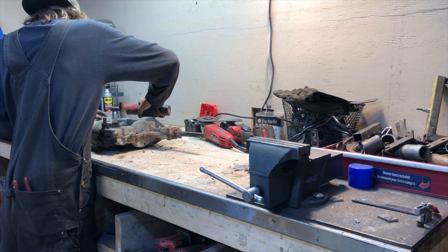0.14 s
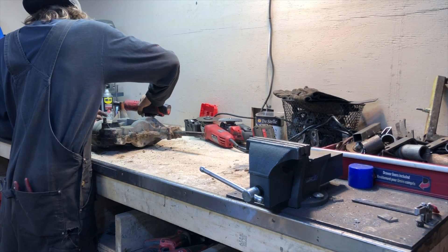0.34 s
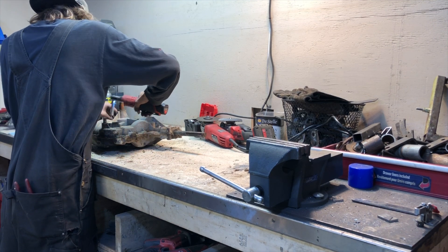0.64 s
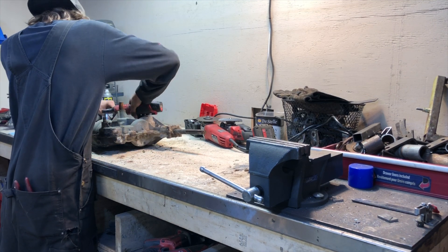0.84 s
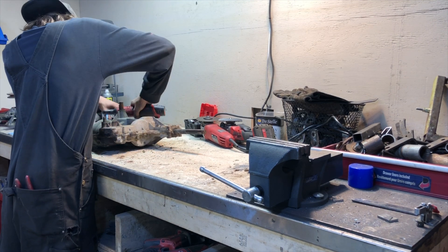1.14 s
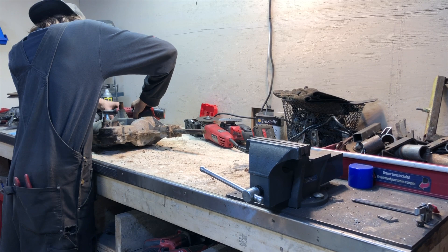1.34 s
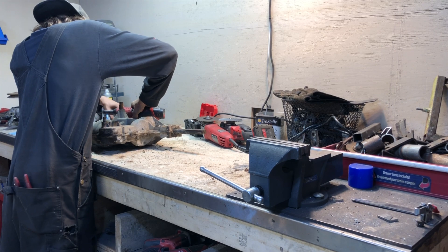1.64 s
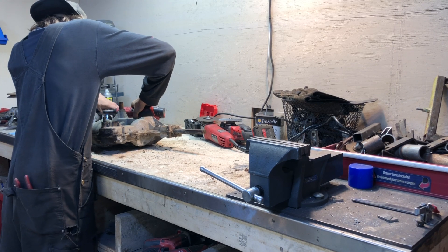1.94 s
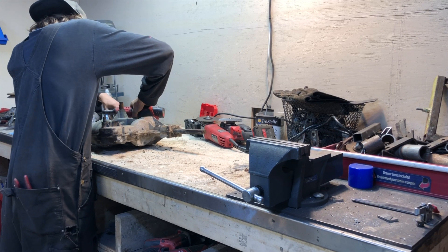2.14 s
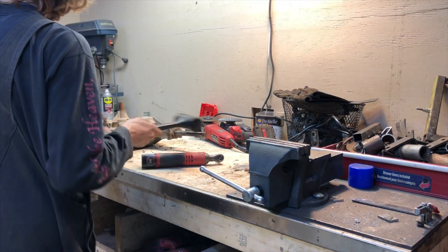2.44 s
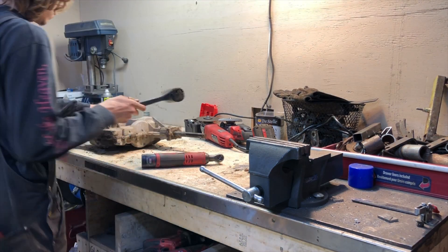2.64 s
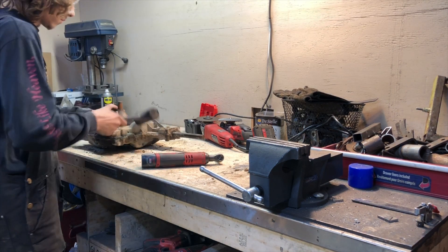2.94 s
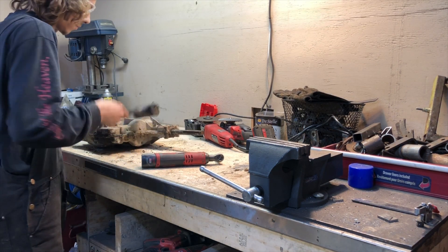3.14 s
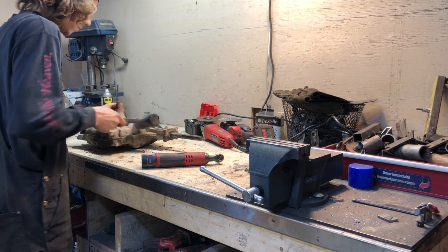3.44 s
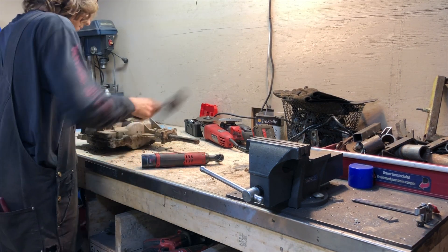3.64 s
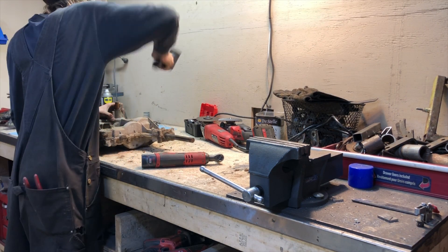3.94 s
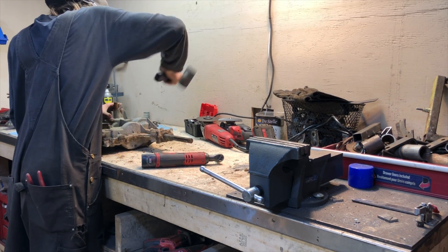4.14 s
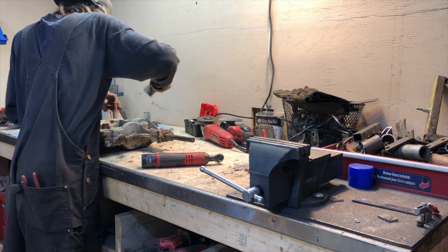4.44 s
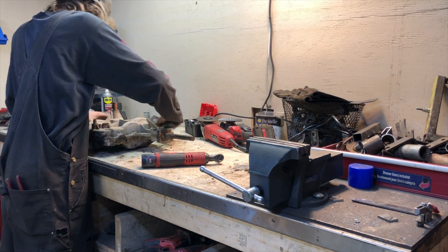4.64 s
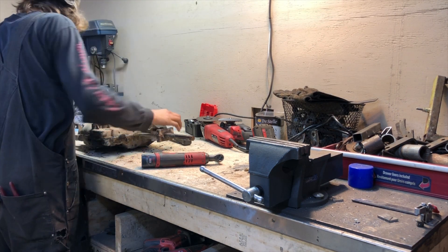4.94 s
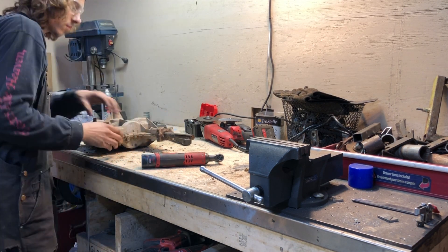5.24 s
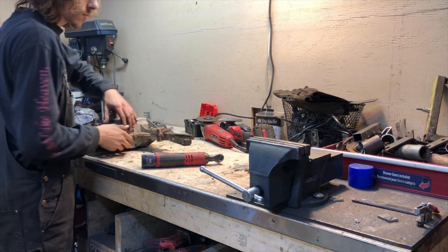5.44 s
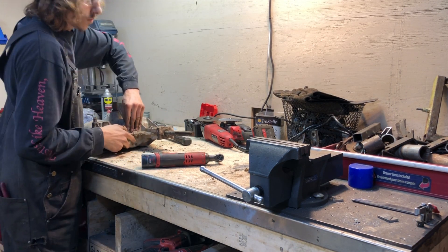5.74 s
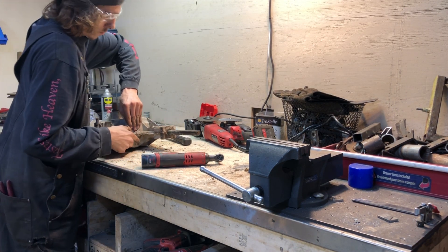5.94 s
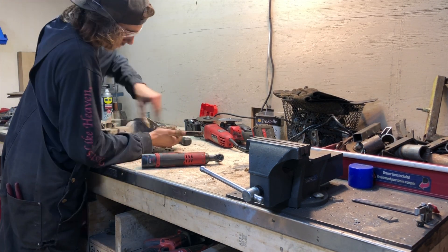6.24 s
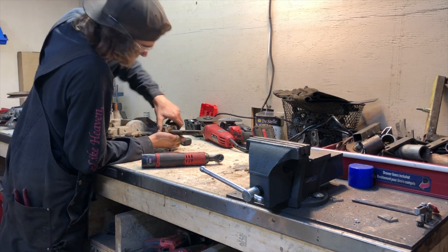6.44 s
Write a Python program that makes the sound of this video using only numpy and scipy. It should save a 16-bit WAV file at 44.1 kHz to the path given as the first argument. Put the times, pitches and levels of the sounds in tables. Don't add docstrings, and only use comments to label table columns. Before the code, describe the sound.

Close over a wooden bench in a low garage, a small electric ratchet whirs with gritty hiss and coasts to a stop. It clacks and knocks onto a bolt, then drives hard with the bench droning beneath. An abrupt cut leads to ten quick mallet blows on a ringing metal case, growing woodier; the case is laid down with a clunk, and hands rustle and scrape loose parts.

```python
import sys
import numpy as np
from scipy import signal
from scipy.fft import rfft, irfft, next_fast_len
from scipy.io import wavfile
from scipy.ndimage import uniform_filter1d, map_coordinates

SR = 44100
rng = np.random.default_rng(int(sys.argv[2]) if len(sys.argv) > 2 else 0)


def magnitude_from_level(level_db):
    exponent = np.asarray(level_db, float) / 20
    return 10 ** exponent


def inscribe(sig):
    pcm = np.round(np.clip(np.atleast_2d(sig).T, -1, 1) * 32767)
    wavfile.write(sys.argv[1], SR, pcm.astype(np.int16))


N = 291060
SCENE_CHANGE_S = 2.388

# frequency [Hz], level [dB per Hz].
AIR_COLOUR = [(24, -30), (40, -16), (140, 10), (410, -2), (935, -4), (1090, -2.5), (2140, -13), (4090, -14),
              (5390, -22), (8450, -18), (15800, -36)]
# frequency [Hz], time to fall 60 dB [s].
ROOM_DECAY = [(100, 0.39), (300, 0.32), (1000, .26), (4000, 0.27), (13000, 0.22)]

# start [s], length [s], rustle [dB], scrape [dB].
HAND_STROKES = [(2.39, 0.15, -49.5, -61), (4.53, 0.049, -97, -72.5), (5.11, 0.034, -66, -67),
                (5.2, 0.046, -50, -54.5), (5.3, 0.24, -65, -70), (5.555, 0.039, -59, -70),
                (5.62, 0.049, -67, -61.5), (5.73, 0.031, -55, -69.5), (5.8, 0.033, -58, -66),
                (5.905, .05, -58.5, -53.5), (5.96, 0.065, -59.5, -55), (6.022, .035, -53.5, -54),
                (6.085, .005, -57.5, -66), (6.15, 0.028, -63, -73), (6.243, .008, -59.5, -60),
                (6.275, .02, -63, -65), (6.45, .15, -63, -58.5)]
# frequency [Hz], level [dB per Hz].
CLOTH_COLOUR = [(710, -4), (1200, -0.5), (1730, -5), (1860, -2), (2520, -4.5), (4600, -7.5), (15600, -18)]
# frequency [Hz], level [dB per Hz].
DRAG_COLOUR = [(180, -40.5), (300, 1.5), (755, 5), (968, -7), (1110, -1), (2500, -15.5), (3250, -44.5),
               (5500, -120)]

# time [s], frequency [Hz], level [dB].
SOCKET_SONG = [
    [(0, 8240, -55), (.4, 8360, -46), (.5, 8200, -70)],
    [(1.2, 8150, -65), (1.35, 8240, -47), (1.7, 8260, -49), (1.85, 8140, -30.5), (1.9, 8200, -65)],
]
# time [s], frequency [Hz], level [dB].
SOCKET_PING = [
    [(2.573, 8280, -52), (2.7, 8280, -75)],
    [(2.764, 8285, -45), (2.94, 8285, -72)],
]
# frequency [Hz], level [dB].
CONTROL_WHINE = [(3763, -59), (7407, -68), (11073, -71)]
# time [s], whine level [dB].
TRIGGER = [
    (.962, -20),
    (.978, -8),
    (1.0, 12),
    (1.012, -15),
]

# time [s], shaft speed [turns per s], load pressed into the bench [dB].
COASTING = [
    (0.0, 140, -6),
    (0.35, 156.4, -12.5),
    (0.426, 152.9, -19.5),
    (0.48, 131.4, -20),
    (0.594, 106.7, -25),
    (0.682, 98.5, -49),
    (0.775, 77, -70),
]
# time [s], shaft speed [turns per s], load pressed into the bench [dB].
DRIVING = [
    (0.986, 120.6, -28),
    (1.014, 130.9, 4),
    (1.046, 128.6, 7.5),
    (1.141, 153.5, -2),
    (1.184, 152.1, 1.5),
    (1.3, 154.2, -2),
    (2.1, 156.2, -1.5),
    (2.355, 156.4, 1.5),
    (2.383, 159.4, -13),
]
# multiple of shaft speed, level [dB].
SHAFT_ORDERS = [(1, -10.5), (2, 1.5), (3, -4.5), (4, -0.5), (4.41, 4), (5, 0), (6, -2.5), (8, -4.5),
                (10, -6), (11, -6), (16, 0), (17, -3.5), (18, -1), (19, -4.5)]
# frequency [Hz], level [dB per Hz].
HISS_COLOUR = [(530, -61), (900, -7.5), (967, -19.5), (1000, -10), (1230, -8), (1700, -4.5), (2080, -5),
               (2580, -5), (3870, -4.5), (4970, -0.5), (8210, 1), (9140, 0.5), (15600, 2)]
# frequency [Hz], width [Hz], level over the hiss [dB].
HOUSING_MODES = [(1480, 50, 4), (1530, 47, -12.5), (1719, 31, -1.5), (2330, 29, -4), (2320, 50, -20),
                 (2576, 22, 4), (3000, 110, -3), (3360, 320, -3), (3530, 60, 2.5), (3805, 160, -0.5),
                 (4350, 48, 1.5), (6180, 69, -2), (7150, 220, -5.5), (8200, 210, -2.5), (11300, 150, -3.5),
                 (12600, 110, -8.5), (14330, 20, -10), (14750, 370, -3)]
# frequency [Hz], width [Hz], level [dB].
DRONE_MODES = [(110, 10, -17), (164, 23, -13.5), (210, 14, -18), (330, 13, -3.5), (398, 16, -4.5),
               (522.6, 17, 1), (614, 22, -3), (693.5, 8.5, 3), (774, 9.5, 0), (877, 24, -12.5)]

# frequency [Hz], level [dB], time to fall 60 dB [s].
BENCH_AND_CASE_MODES = [(114, 5, 0.26), (169.8, 4, 0.079), (199, -0.5, 0.12), (229, -6, 0.081), (284.2, 4.5, 0.12),
                        (310.4, -2.5, 0.19), (381, 1.5, 0.19), (407.3, -1.5, 0.17), (462.4, -9, 0.39),
                        (522, 2.5, .2), (606, 0.5, 0.2), (682, -1.5, 0.24), (772, -4, 0.18), (897, -11.5, 0.099),
                        (1176, -10.5, .22), (1234, -12, 0.067), (1338, -11, 0.12), (1386, -8, .2), (1572, -1, 0.043),
              (1806, -14, 0.34), (1870, -6.5, 0.1), (2080, -25.5, .2), (2220, -12, 0.1), (2540, -11, 0.055),
              (2630, -13, 0.05), (2930, -11, 0.31), (3430, -6, .12), (3820, -10.5, .1)]
# time [s], strength [dB], wood over case [dB], sharpness [dB].
CLACKS = [
    (0.77, -44, 7.2, 8),
    (0.7948, -45, 6.6, 15),
    (0.955, -63.5, 3.7, 4),
]
# time [s], strength [dB], wood over case [dB], sharpness [dB].
KICKS = [
    (1.011, -42.5, 7, -21),
    (1.033, -23.5, 6, -40.5),
    (1.069, -39, -2.1, -19.5),
]
# time [s], strength [dB], wood over case [dB], sharpness [dB].
KNOCKS = [
    (0.8345, -34.5, -10.5, -8),
    (0.8594, -41, 3, -6),
    (4.5363, -54.5, 0.4, -17),
    (5.3382, -59, 13, 1),
    (5.7109, -32.5, -7.5, -19.5),
    (5.7743, -42.5, 1, -5.5),
    (6.2794, -57.5, -9, 2.5),
    (6.4344, -38, -11, -26),
    (6.4986, -41.5, -6.5, -19),
    (6.5455, -45.5, -10, -15),
]
# time [s], strength [dB], wood over case [dB], sharpness [dB].
TAPS = [
    (2.4044, -36, 15, -12.5),
    (4.7496, -25.5, -18.5, -12),
    (4.7866, -13.5, -2, -20.5),
    (6.1177, -49.5, -18, -26),
]
# time [s], strength [dB], wood over case [dB], sharpness [dB].
REBOUNDS = [
    (2.8194, -23, 2.5, -5),
    (2.8436, -26, 3, -3),
    (3.7509, -35.5, 3, 5),
    (3.8102, -49.5, -3, 14),
    (4.0634, -30, 3, 1),
    (4.37, -45.5, -2, 6),
    (4.6214, -34, 12.5, -14.5),
    (4.6646, -44.5, 23, -14),
]
# time [s], strength [dB], wood over case [dB], sharpness [dB].
BLOWS = [
    (2.5714, -15.5, -7, -5),
    (2.7624, -15.5, -7, -3),
    (2.9552, -12.5, -7, -3.5),
    (3.1322, -12, 2.5, -3.5),
    (3.3044, -13.5, -5.5, 1.5),
    (3.4664, -12, -11.5, 0),
    (3.6752, -13, 14, -8.5),
    (3.8581, -7.5, 6, -13.5),
    (4.0386, -18.5, 11.5, -5.5),
    (4.2111, -10, 14, -11),
]
# edge, thud, wood, case, clank [Hz], for each kind of contact.
BLOW_HZ = [9000, 130, 290, 1300, 3000]
KNOCK_HZ = [9000, 140, 330, 850, 3400]
TAP_HZ = [8000, 140, 330, 760, 1900]
CLACK_HZ = [6000, 140, 600, 1150, 3400]
PART_SPREAD = [-8.5, 12, 7.5, 9.5, 3.5]


def unit(x):
    return x / np.sqrt(np.mean(x ** 2) + 1e-20)


def along(points, hz):
    f, v = np.transpose(points)
    return np.interp(np.log(hz + 1), np.log(f + 1), v)


def curves(*tables, rest=-120):
    t = np.arange(N) / SR
    out = np.full((len(tables[0][0]) - 1, N), float(rest))
    for rows in tables:
        s, *cols = np.transpose(rows)
        inside = (t >= s[0]) & (t <= s[-1])
        out[:, inside] = [np.interp(t[inside], s, c) for c in cols]
    return out


def wobble(rate):
    return map_coordinates(rng.standard_normal(int(N * rate / SR) + 4), [np.arange(N) * rate / SR])


def filtered(x, response):
    m = next_fast_len(N + SR // 2)
    return unit(irfft(rfft(x, m) * response(np.fft.rfftfreq(m, 1 / SR)), m)[:N])


def peaks(modes, f):
    total = 0
    for k, (centre, width, db) in enumerate(modes):
        damping = 1j * f * width
        total = total + (-1) ** k * magnitude_from_level(db) * damping / (centre * centre - f * f + damping)
    return total


def grit(spiky_db):
    return rng.standard_normal(N) * magnitude_from_level(spiky_db * rng.standard_normal(N))


def causal(gain_db):
    c = irfft(gain_db * np.log(10) / 20)
    c[1:len(c) // 2] *= 2
    c[len(c) // 2 + 1:] = 0
    return np.exp(rfft(c))


def room_tail(size, rise_s):
    hz, t, z = signal.stft(rng.standard_normal(size), SR, nperseg=256)
    decay = magnitude_from_level(-60 * t / along(ROOM_DECAY, hz)[:, None])
    answer = signal.istft(z * decay, SR, nperseg=256)[1][:size]
    answer *= 1 - np.exp(-np.arange(size) / SR / rise_s)
    return answer / np.linalg.norm(answer)


def garage_air():
    level_db = -61.5 + 1.5 * wobble(4.6) + 2 * wobble(13)
    air = filtered(rng.standard_normal(N), lambda f: magnitude_from_level(along(AIR_COLOUR, f)))
    mic_hiss = filtered(rng.standard_normal(N), lambda f: f > 5000)
    return magnitude_from_level(level_db) * air + magnitude_from_level(-72.5) * mic_hiss


def strokes(rows, fade_db_s):
    t = np.arange(N) / SR
    swell_db_s = 1599.5
    power = 0
    for s, hold, *db in rows:
        swell_db = swell_db_s * np.minimum(t - s - .006, 0)
        fade_db = -fade_db_s * np.maximum(t - s - hold, 0)
        power = power + magnitude_from_level(2 * (np.minimum(swell_db, fade_db) + np.array(db)[:, None]))
    return np.sqrt(power)


def hands():
    jiggle = [(s, 0, force + sharp - 26, force - 29) for s, force, woody, sharp in BLOWS]
    rustling, scraping = strokes(HAND_STROKES, fade_db_s=325) + strokes(jiggle, fade_db_s=86)
    cloth = filtered(grit(spiky_db=3), lambda f: magnitude_from_level(along(CLOTH_COLOUR, f)))
    z = signal.stft(cloth, nperseg=256)[2]
    patches = uniform_filter1d(rng.standard_normal(z.shape), size=5, axis=0)
    patches = uniform_filter1d(patches, size=9, axis=1)
    rustle = unit(signal.istft(z * magnitude_from_level(4 * unit(patches)), nperseg=256)[1][:N])
    scrape = filtered(grit(spiky_db=4), lambda f: magnitude_from_level(along(DRAG_COLOUR, f)))
    return rustling * magnitude_from_level(2 * wobble(60)) * rustle + scraping * magnitude_from_level(2.5 * wobble(30)) * scrape


def singing():
    t = np.arange(N) / SR
    hz, db = curves(*SOCKET_SONG, *SOCKET_PING)
    phase = 2 * np.pi * np.cumsum(hz + 25 * wobble(55)) / SR
    socket = magnitude_from_level(db + 2.7 * wobble(30)) * np.sin(phase)
    trigger_db, = curves(TRIGGER)
    whine = sum(magnitude_from_level(level) * np.sin(2 * np.pi * f * t) for f, level in CONTROL_WHINE)
    return socket + magnitude_from_level(trigger_db) * whine


def motor():
    t = np.arange(N) / SR
    speed, load_db = curves(COASTING, DRIVING)
    since, left = t - DRIVING[0][0], DRIVING[-1][0] - t
    driven = (since >= 0) & (left >= 0)
    free_speed = 154.2
    slow_db = np.minimum(20 * np.log10(np.maximum(speed, 1e-3) / free_speed), 0)
    catch_db = -45 * np.exp(-np.abs(since) / .013)
    edge_db = catch_db - 25 * np.clip(1 - left / .011, 0, 1)
    coast_db = 4.9 * np.minimum(slow_db + .73, 0) + .55 * slow_db * wobble(90)
    hiss_db = -28 + np.where(driven, edge_db, coast_db)
    bind_db = 3.5 * np.exp(-np.abs(since) / .35)
    rattle_db = -37 + .17 * load_db + np.where(driven, 1.1 * edge_db + bind_db, 1.5 * slow_db)
    shake_db = -42 + load_db
    hum_db = -45 + 1.14 * np.minimum(load_db, 0) + 13 * slow_db
    return speed, hiss_db, rattle_db, shake_db, hum_db


def ratchet():
    speed, hiss_db, rattle_db, shake_db, hum_db = motor()
    turn = 2 * np.pi * np.cumsum(np.maximum(speed, 0) * (1 + .002 * wobble(30))) / SR
    throb = 1 + .082 * np.cos(turn)
    walls = room_tail(SR // 3, .003)

    def in_room(x, room_db):
        return x + magnitude_from_level(room_db) * signal.fftconvolve(x, walls)[:N]

    def colour(f):
        return magnitude_from_level(along(HISS_COLOUR, f)) * np.sqrt(1 + np.abs(peaks(HOUSING_MODES, f)) ** 2 * 4)

    hiss = filtered(in_room(throb * grit(spiky_db=2), room_db=-10),
                    lambda f: colour(f) / np.sqrt(1 + (3000 / (f + 1)) ** 8))
    rattle = filtered(in_room(throb * grit(spiky_db=1.5), room_db=-3),
                      lambda f: colour(f) / np.sqrt(1 + (f / 3000) ** 8))
    orders = sum(magnitude_from_level(db + 2.3 * wobble(12)) * np.sin(k * turn + k * k) for k, db in SHAFT_ORDERS)
    drone = filtered(grit(spiky_db=4.5), lambda f: peaks(DRONE_MODES, f) / (1 + (90 / (f + 1)) ** 6))
    noise = magnitude_from_level(hiss_db + .35 * wobble(5.8)) * hiss + magnitude_from_level(rattle_db + .4 * wobble(22)) * rattle
    return noise + magnitude_from_level(shake_db) * drone + magnitude_from_level(hum_db) * orders


def ringing(t, ring_db):
    ring = 0
    for hz, db, t60 in BENCH_AND_CASE_MODES:
        fading = magnitude_from_level(db + rng.normal(0, 3.9) - 60 * t / t60)
        ring = ring + fading * np.sin(2 * np.pi * hz * rng.normal(1, .006) * t)
    return magnitude_from_level(ring_db) * ring


def contacts(table, part_hz, thud_db, clank_db, crack_db, ring_db, travel_s, soft_s=.0001):
    size = SR // 2
    out = np.zeros(N + size)
    t, f = np.arange(size) / SR, np.fft.rfftfreq(size, 1 / SR)
    for s, force, woody, sharp in table:
        wood, case = force + woody / 2, force - woody / 2
        clank = force + clank_db + .35 * sharp
        parts_db = np.add([force + sharp, wood + thud_db, wood, case, clank], PART_SPREAD)
        contact_s = np.clip(.0017 + soft_s * woody, .0007, .005)
        slow_lows = np.exp(-2j * np.pi * (travel_s + .8 * contact_s) * 300 * np.log(1 + f / 60))
        crack = t / contact_s * np.exp(-t / contact_s) * rng.standard_normal(size)
        crack[round(contact_s * SR)] += .29 * np.linalg.norm(crack)
        crack /= np.linalg.norm(crack)
        direct = magnitude_from_level(crack_db) * rfft(crack) * 1j * f / (1j * f + 600)
        sound = ringing(t, ring_db) + room_tail(size, 2 * contact_s)
        tone = sorted(zip(part_hz, parts_db))
        low_db, high_db = tone[0][1], tone[-1][1]
        tone = [(30, low_db - 12), (75, low_db - 14)] + tone + [(15000, high_db - 3)]
        heard = (rfft(sound) + direct) * slow_lows * causal(along(tone, f))
        out[round(s * SR):][:size] += irfft(heard, size)
    return out[:N]


def clacks():
    return magnitude_from_level(24) * contacts(CLACKS, CLACK_HZ, thud_db=-17, clank_db=9.5, crack_db=2.5, ring_db=-38,
                              travel_s=.004, soft_s=-.000074)


def bumps():
    def bump(rows, thud_db, clank_db, part_hz=KNOCK_HZ):
        return contacts(rows, part_hz, thud_db, clank_db, crack_db=-1, ring_db=-44.5, travel_s=.007)

    heavy = bump(KNOCKS, thud_db=3.5, clank_db=-12) + bump(KICKS, thud_db=-9.5, clank_db=1)
    again = bump(REBOUNDS, thud_db=-9, clank_db=-8.5)
    light = bump(TAPS, thud_db=-23.5, clank_db=3, part_hz=TAP_HZ)
    return magnitude_from_level(25) * (heavy + again + light)


def mallet():
    return magnitude_from_level(26) * contacts(BLOWS, BLOW_HZ, thud_db=-15, clank_db=-6.5, crack_db=1.63, ring_db=-43.5,
                              travel_s=.005)


def scene():
    mono = garage_air() + hands() + singing() + ratchet() + clacks() + bumps() + mallet()
    return np.array([mono, mono])


def low_pass(x):
    return signal.sosfilt(signal.butter(12, 17040, fs=SR, output="sos"), x)


def record(dry):
    since = np.arange(N) / SR - SCENE_CHANGE_S
    dip_db = -4 * np.exp(-(since / .011) ** 2)
    x = dry * magnitude_from_level(np.where(since < 0, 1, -1) + dip_db)
    x = signal.sosfilt(signal.butter(3, 75, "high", fs=SR, output="sos"), x)
    in_band = np.fft.rfftfreq(2 * N, 1 / SR) < 15750
    x = irfft(rfft(x, 2 * N) * in_band, 2 * N)[:, :N]
    x = x / (1 + np.abs(x / .95) ** 8) ** (1 / 8)
    return low_pass(x)


dry = scene()
out = record(dry)
inscribe(out)
```